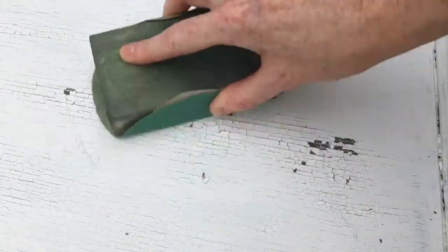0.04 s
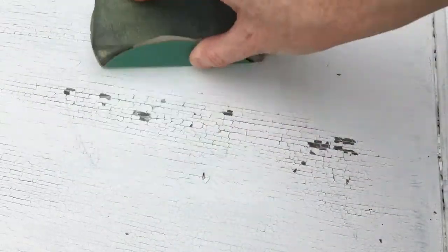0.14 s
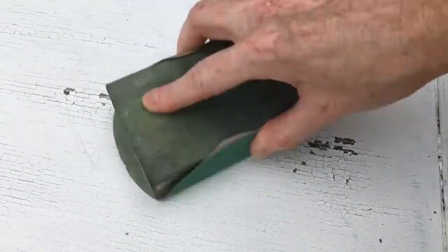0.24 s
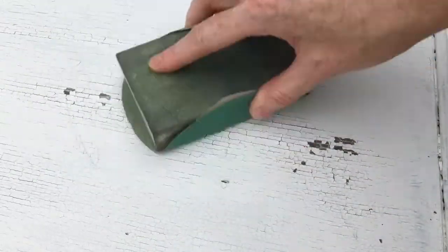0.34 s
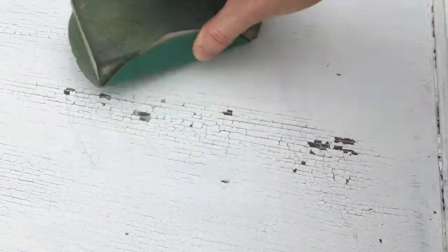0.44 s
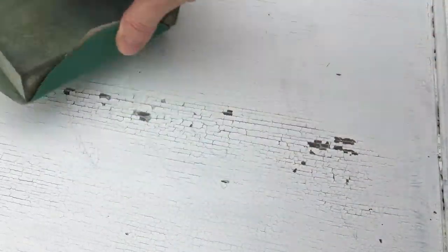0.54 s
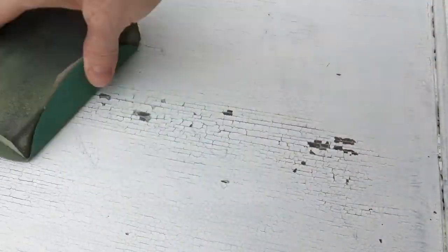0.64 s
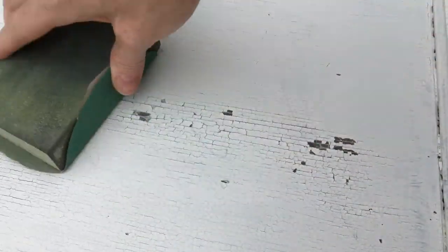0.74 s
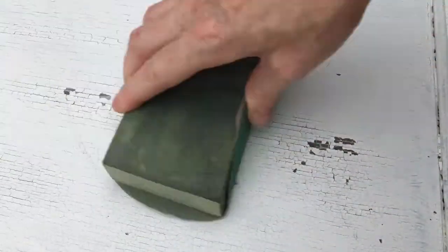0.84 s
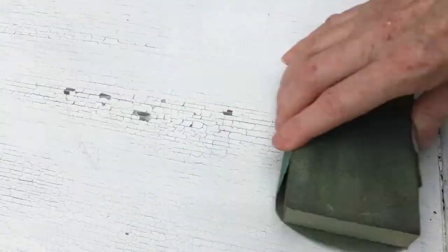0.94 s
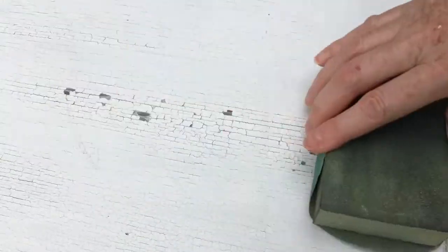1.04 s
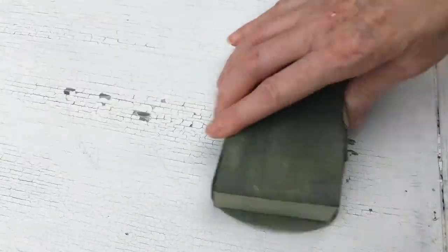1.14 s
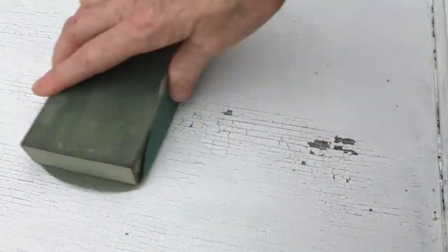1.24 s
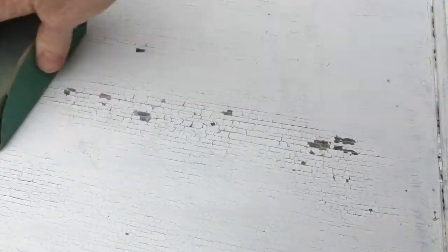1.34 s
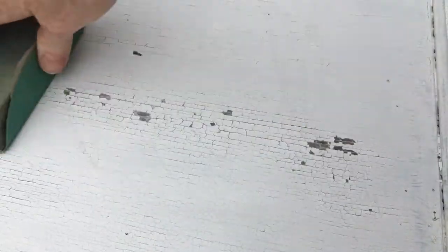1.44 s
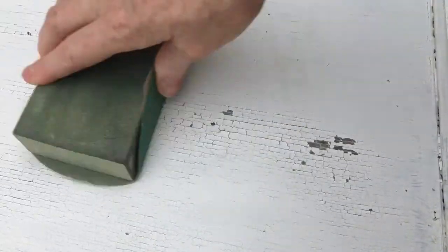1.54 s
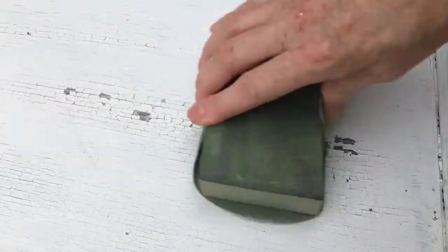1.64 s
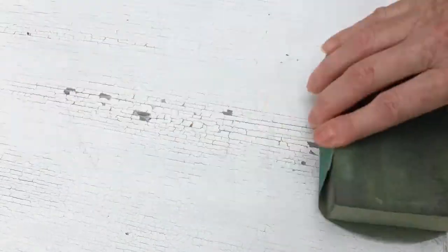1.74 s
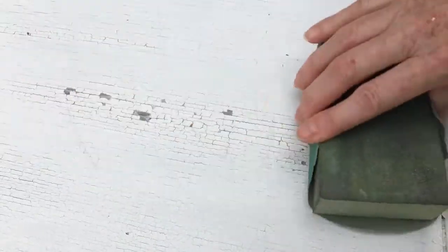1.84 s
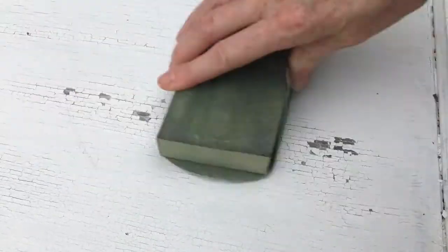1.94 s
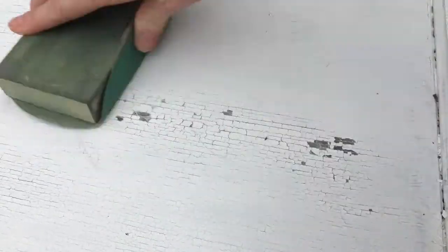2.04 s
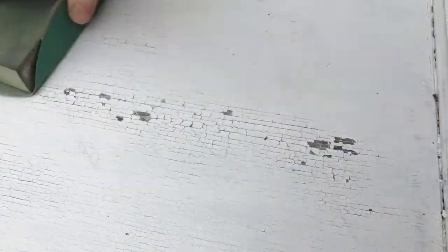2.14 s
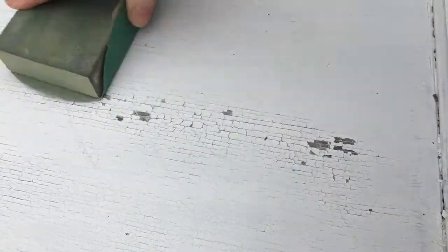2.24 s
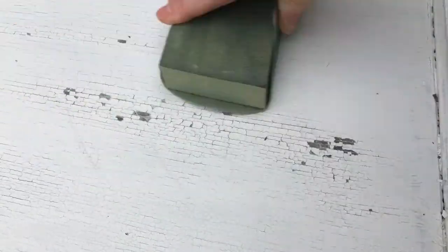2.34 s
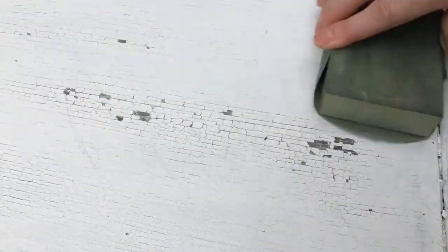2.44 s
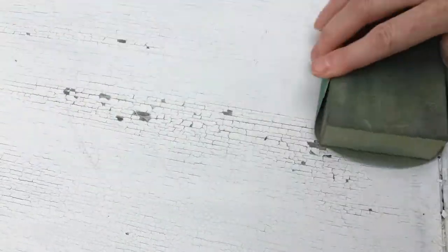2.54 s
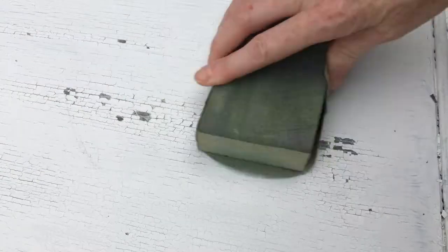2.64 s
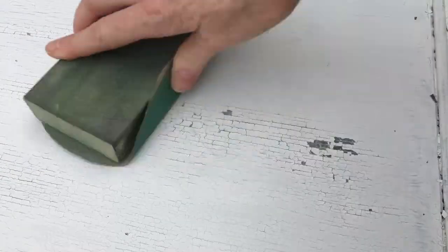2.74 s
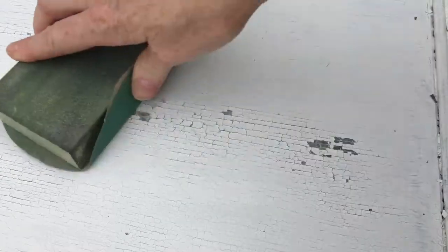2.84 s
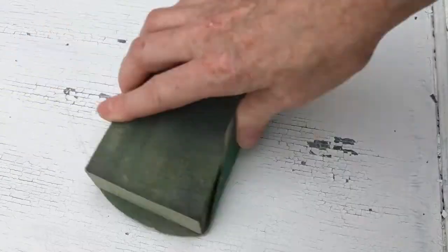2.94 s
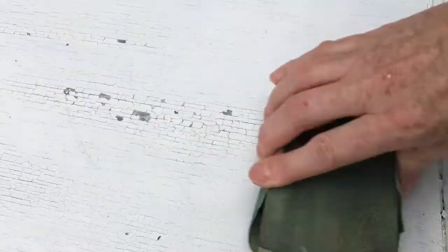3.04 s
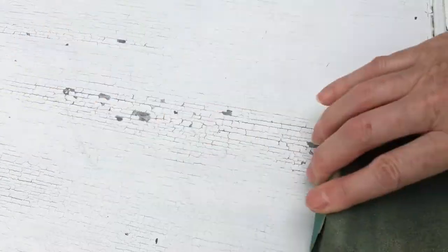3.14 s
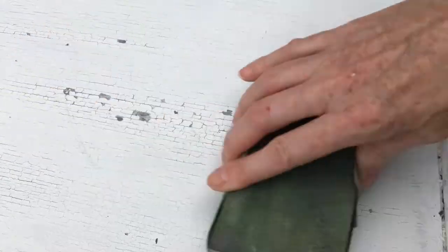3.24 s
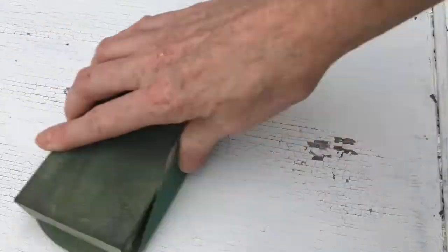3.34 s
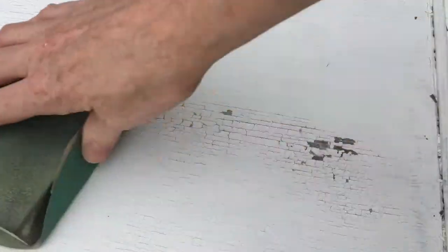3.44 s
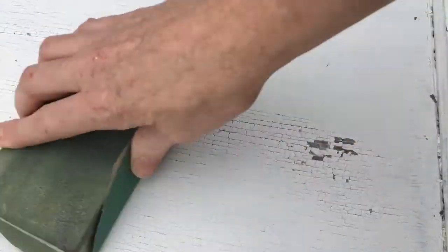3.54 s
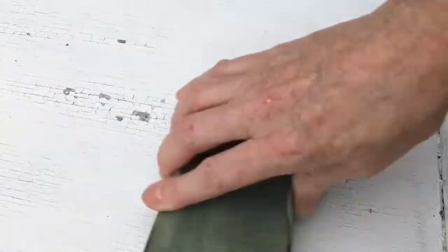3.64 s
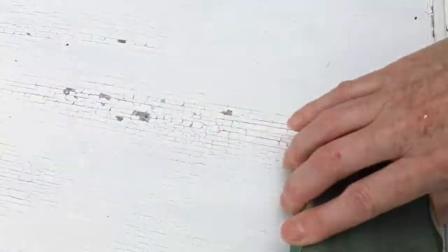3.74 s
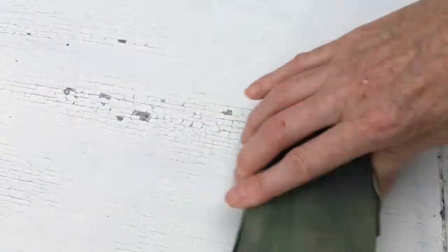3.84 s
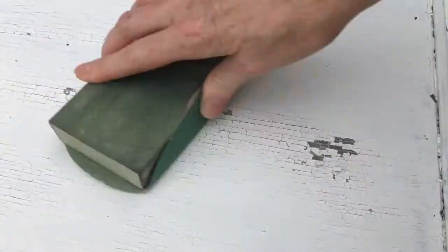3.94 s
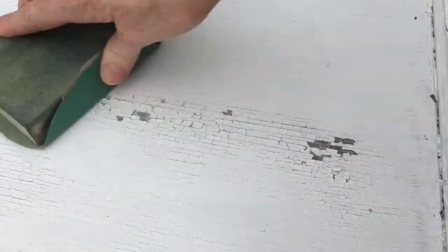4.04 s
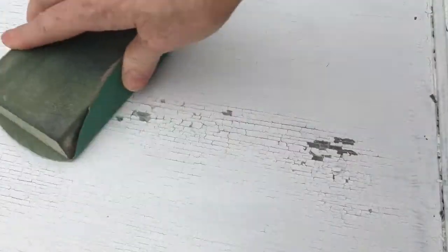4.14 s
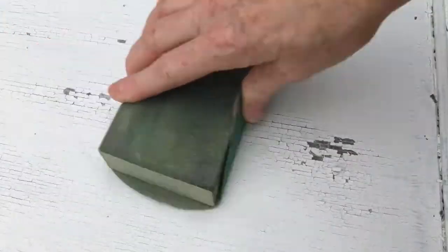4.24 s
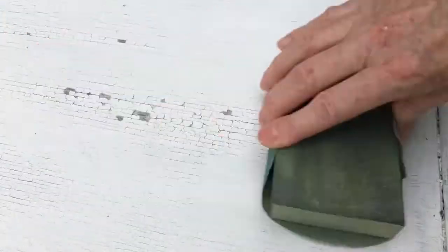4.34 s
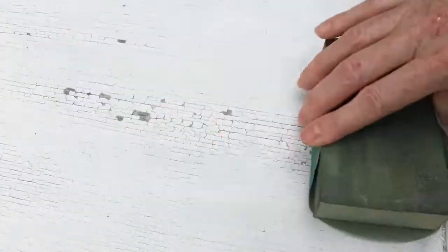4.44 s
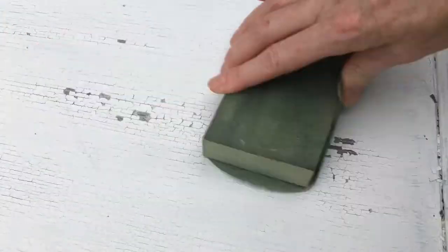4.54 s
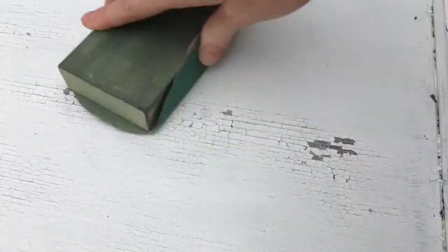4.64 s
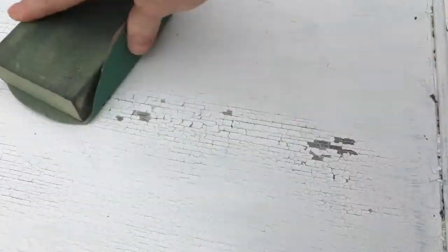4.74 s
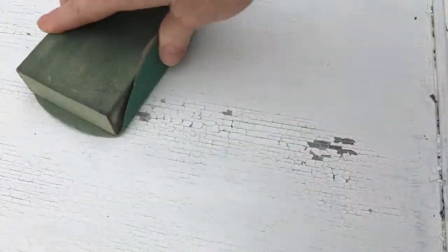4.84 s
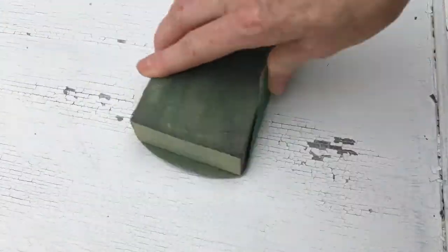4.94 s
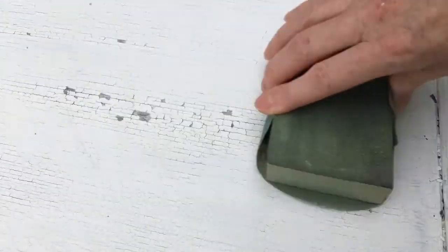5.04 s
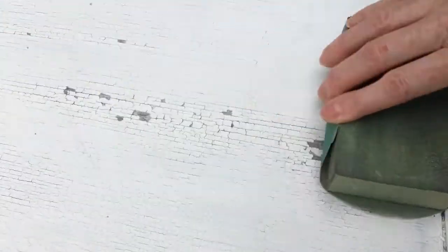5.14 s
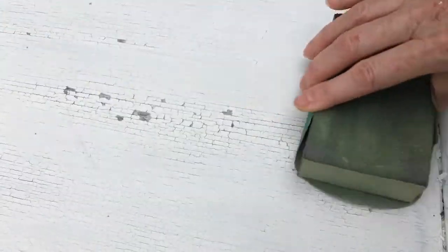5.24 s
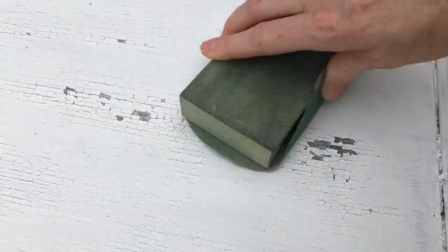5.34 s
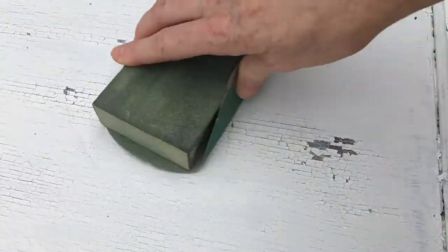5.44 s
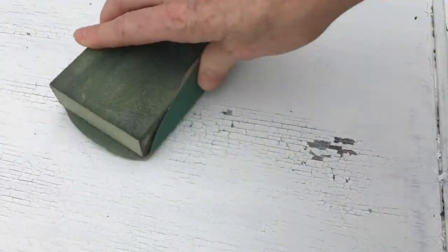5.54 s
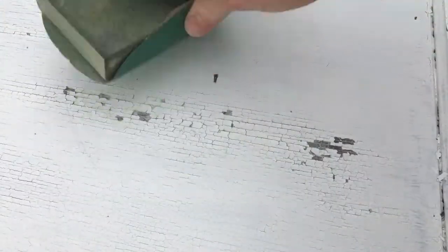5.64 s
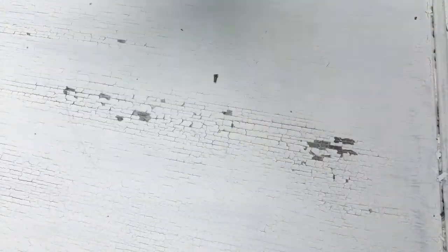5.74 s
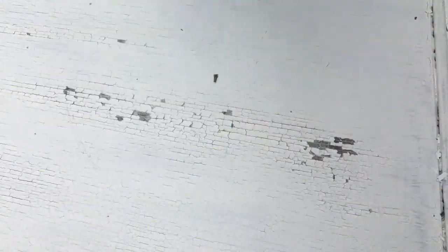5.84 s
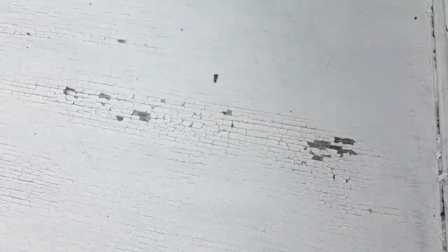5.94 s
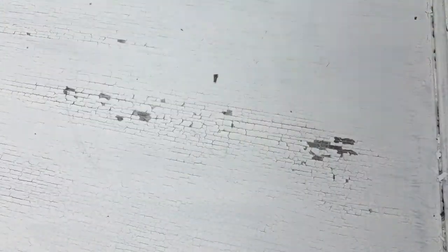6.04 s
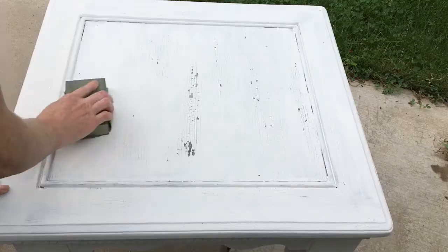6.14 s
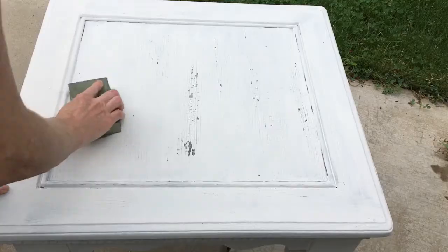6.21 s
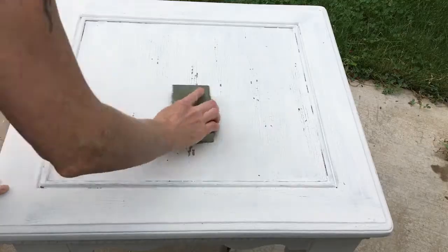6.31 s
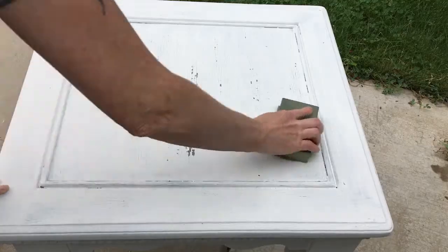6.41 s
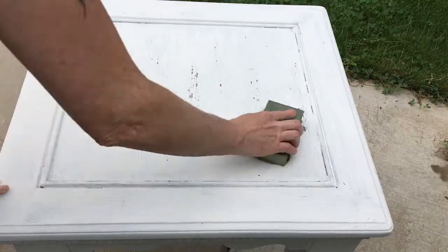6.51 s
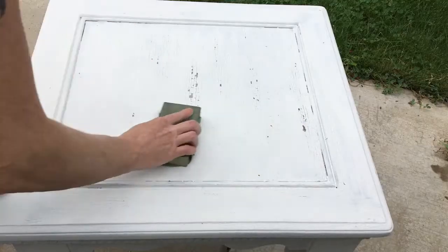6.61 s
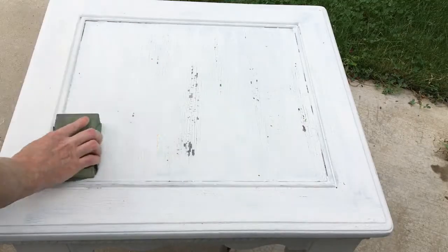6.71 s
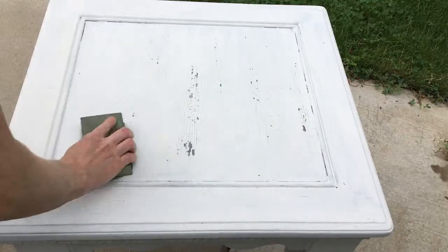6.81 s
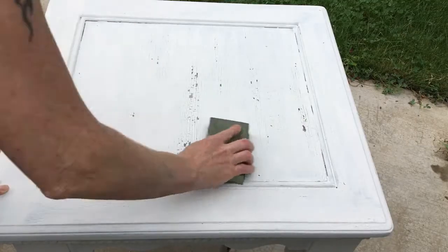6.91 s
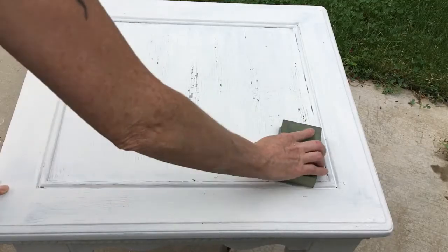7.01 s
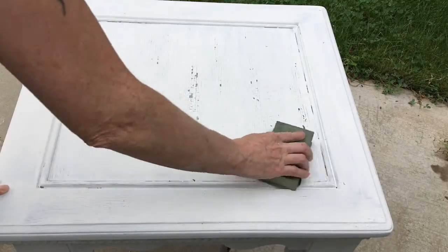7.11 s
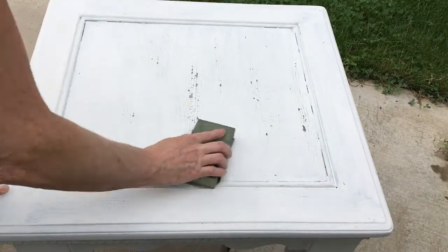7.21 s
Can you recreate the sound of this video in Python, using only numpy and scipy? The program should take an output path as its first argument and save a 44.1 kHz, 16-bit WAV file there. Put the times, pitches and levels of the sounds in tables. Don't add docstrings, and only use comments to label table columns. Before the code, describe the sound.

Quick alternating strokes of sandpaper on painted wood, dry and hissy, each swelling and dipping at the turn, with hollow board knocks now and then. A distant engine hums at the start and fades; other low drones pass faintly. After a short gap the view changes and sanding continues with a little less closeness, while an engine revs softly far away. Open air, little echo, mono sound.

```python
import sys
import numpy as np
from scipy import signal
from scipy.fft import rfft, irfft
from scipy.io import wavfile
from scipy.ndimage import uniform_filter1d

SR = 44100
rng = np.random.default_rng(int(sys.argv[2]) if len(sys.argv) > 2 else 0)


def store_wav(level_fs):
    pcm = np.round(np.clip(np.atleast_2d(level_fs), -1, 1) * 32767)
    wavfile.write(sys.argv[1], SR, pcm.T.astype(np.int16))


def voltage_ratio(decibels):
    exponent = np.asarray(decibels, float) / 20
    return 10 ** exponent


N = 320607
CUT_S = 6.1268


def evened(x):
    return x / np.sqrt(np.mean(x ** 2) + 1e-20)


def read(points, hz):
    f, value = np.transpose(points)
    return np.interp(np.log(hz + 1), np.log(f + 1), value)


def columns(rows):
    s, *cols = np.transpose(rows)
    t = np.arange(max(s[0], 0), s[-1], 1 / SR)
    return t[0], [np.interp(t, s, c) for c in cols]


def add(mix, s, sound):
    part = mix[round(max(s, 0) * SR):][:len(sound)]
    part += sound[:len(part)]


def resonate(x, hz, width):
    turn = np.exp(2j * np.pi * hz * np.arange(len(x)) / SR)
    r = np.exp(-np.pi * abs(width) / SR)
    return 2 * (turn * signal.lfilter([1 - r], [1, -r], x / turn)).real


def fuzzy_tone(count, hz, width):
    noise = rng.standard_normal(count)
    return evened(resonate(resonate(noise, hz, width), hz, width))


def coloured(x, colour_db, size, patchy_db, wide, long):
    hz, t, z = signal.stft(x, SR, nperseg=size)
    patches = rng.standard_normal(z.shape[::-1]).T
    patches = uniform_filter1d(patches, int(wide), 0)
    patches = evened(uniform_filter1d(patches, int(long), 1))
    z = z * voltage_ratio(colour_db(hz[:, None], t) + patchy_db * patches)
    return signal.istft(z, SR, nperseg=size)[1][:N]


def band(x, lo_hz, hi_hz):
    hz = np.fft.rfftfreq(N, 1 / SR) + 1
    loss = (1 + (lo_hz / hz) ** 9) * (1 + (hz / hi_hz) ** 9)
    return irfft(rfft(x) / np.sqrt(loss), N)


def outdoors():
    # f/Hz, density/dB per Hz
    ambient = [(13, -46.5), (25, -34), (48, -1.5), (70, -3), (94, -5), (140, -7), (230, -15.5), (500, -30),
               (1100, -31), (2400, -41), (3600, -49), (4800, -56), (8000, -63), (15700, -72)]
    # t/s, rumble level/dB
    traffic = [(0, -46), (.6, -48), (1., -47.5), (4.699, -51.5), (6.101, -50), (6.4, -55), (7.27, -51.5)]
    # t/s, hiss level over the rumble/dB
    leaves = [(0, 6), (.55, 5), (1.1, 4), (5., 8.5), (5.9, 1), (6.4, 8.5), (7.27, 6.5)]
    # f/Hz, width/Hz, level/dB
    whistles = [
        (70, 4, -52),
        (119.5, 2.5, -53),
        (143, 10, -56),
        (1044, 25, -73),
    ]

    def colour(hz, t):
        leaf_share = hz ** 2 / (hz ** 2 + 370.0 ** 2) / (1 + (hz / 7000.0) ** 4)
        return read(ambient, hz) + leaf_share * np.interp(t, *np.transpose(leaves))

    air = coloured(rng.standard_normal(N), colour, size=2048, patchy_db=2.0, wide=6, long=6)
    s, rumble_db = np.transpose(traffic)
    rumble = voltage_ratio(np.interp(np.arange(N) / SR, s, rumble_db))
    air = air / np.std(band(air, 69.1, 320.)) * rumble
    for hz, width, db in whistles:
        air = air + voltage_ratio(db) * fuzzy_tone(N, hz, width)
    return air


def engines():
    # t/s, firing f/Hz, first-order level/dB
    idle = [(0, 70, -31), (.12, 70.1, -32), (.33, 71.15, -40), (.76, 70.5, -37), (.84, 70.5, -47),
            (1.2, 70.74, -46), (1.3, 72.1, -59)]
    # steady level/dB, fade start t/s, fade/dB per s
    idle_orders = [(-46.5, 0.77, 25), (-43.5, 0.76, 60)]
    # t/s, f/Hz, level/dB
    pull = [(6.13, 49.9, -49), (6.53, 50.2, -49), (6.64, 45.4, -47), (6.8, 50.4, -41.5), (6.855, 52.8, -58),
            (6.89, 54.3, -42), (7.27, 55.4, -37)]
    # loudest t/s, f/Hz, level/dB, swell/s, fade/s (time for 10 dB)
    drones = [
        (1.58, 157.5, -43.5, 0.14, 0.15),
        (1.86, 158.5, -48, .08, 0.31),
        (3.92, 226, -71, 0.23, 0.27),
        (5.45, 232, -55, 0.33, .35),
        (6.66, 102.5, -45, .1, 0.42),
        (7.22, 100.5, -44, .06, 0.23),
    ]
    out = np.zeros(N)
    for rows, orders in ((idle, idle_orders), (pull, [])):
        s, (hz, first_db) = columns(rows)
        turns, t = np.cumsum(hz) / SR, np.arange(len(hz)) / SR
        orders_db = [first_db] + [db - fade * np.maximum(t - at, 0) for db, at, fade in orders]
        tone = np.zeros(len(hz))
        for k, db in enumerate(orders_db, 1):
            tone -= voltage_ratio(db + 1.5) * np.cos(2 * np.pi * k * turns)
        add(out, s, tone * signal.windows.tukey(len(hz), 500 / len(hz)))
    t = np.arange(N) / SR
    for s, hz, db, swell, fade in drones:
        down_db = 10 * np.where(t < s, (s - t) / swell, (t - s) / fade)
        out = out + voltage_ratio(db + 2.0 - down_db) * np.cos(2 * np.pi * hz * t)
    return out


def hand():
    # break-away t/s, slide/s, top scrape level/dB, top at share of slide/0-1, slowing before stop/dB
    rightward = [(0.718, 0.28, -34.4, 0.25, 12.2), (1.441, 0.324, -35.2, 0.2, 10.2),
                 (2.192, 0.268, -34.9, 0.37, 5.8), (2.864, 0.248, -35.4, 0.28, 9.7),
                 (3.514, 0.251, -33.3, 0.31, 15.8), (4.127, 0.289, -35.7, 0.33, 12.6),
                 (4.812, 0.311, -37.8, 0.25, 6.6)]
    leftward = [(1.067, 0.31, -35.9, 0.85, 11.3), (1.838, 0.296, -35.9, 0.7, 9.0),
                (2.549, 0.264, -36.4, 0.76, 15.8), (3.184, 0.27, -35.7, 0.84, 14.6),
                (3.818, 0.249, -36.0, 0.64, 11.7), (4.477, 0.271, -36.8, 0.73, 11.2),
                (5.234, 0.311, -40.1, 0.42, 16.3)]
    far_right = [
        (6.208, 0.22, -36.9, 0.21, 2.6),
        (6.77, 0.265, -37.2, 0.26, 10.2),
    ]
    far_left = [
        (5.95, 0.218, -36.1, 0.86, 14.1),
        (6.493, 0.237, -36.0, 0.88, 12.0),
        (7.1, 0.302, -38.3, 0.71, 10.0),
    ]
    scrubs = [
        (-0.025, 0.145, -37.6, 0.83, 5.6),
        (0.162, 0.126, -37.5, 0.73, 13.9),
        (0.291, 0.137, -40.0, 0.5, 16.2),
        (2.483, 0.027, -58.7, 0.19, 4.2),
        (2.517, 0.023, -48.6, 1.0, 3.5),
    ]
    # start place, end place (0 left - 1 right), break-away under top/dB, rise bend, fall bend
    ways = [
        (.03, .88, 8.8, 2.23, 2.3),
        (.88, -.07, 14.9, 6.6, 2.28),
        (.02, .89, 15.3, 1.16, 3.9),
        (.75, .02, 14, 3.9, 2.5),
        (1.04, .52, 9.2, 3.04, 1.08),
    ]
    # breaking loose/dB per s, sticking/dB per s
    grip = [(1910, 1210), (890, 1440), (1420, 1560), (1050, 780), (2030, 1640)]
    top, slow = np.full(N, -200.), np.zeros(N)
    ends, t = [], np.arange(N) / SR
    kinds = zip((rightward, leftward, far_right, far_left, scrubs), ways, grip)
    for rows, (first, last, break_db, rise, fall), (slip, stick) in kinds:
        for s, slide, db, share, fall_db in rows:
            on = slice(max(round((s - .06) * SR), 0), round((s + slide + .06) * SR))
            u = np.clip((t[on] - s) / slide, 0, 1)
            p = np.clip(share, .05, .95)
            lost = break_db * np.maximum(1 - u / p, 0) ** rise
            lost = lost + fall_db * np.maximum((u - p) / (1 - p), 0) ** fall
            held = db - slip * np.maximum(s - t[on], 0) - stick * np.maximum(t[on] - s - slide, 0)
            louder = held - lost > top[on] - slow[on]
            top[on], slow[on] = np.where(louder, [held, lost], [top[on], slow[on]])
            ends += [(s, first), (s + slide, last)]
    return top, slow, np.interp(t, *np.transpose(sorted(ends)))


def sanding():
    # f/Hz, density/dB per Hz
    near_spectrum = [(240, -31), (400, -21), (890, -16.5), (1150, -11), (2000, -7.5), (2850, -2.5),
                     (3350, -6), (4460, -4), (6150, -1.5), (7510, -4.5), (8760, 0.5), (10200, -4),
                     (12100, -1.5), (15700, -4)]
    far_spectrum = [(240, -56), (400, -26), (519, -11.5), (836, -14.5), (960, -9), (1480, -6), (2410, 0),
                    (3710, -4.5), (4320, -5), (6060, -2), (7630, -5.5), (8900, 1), (10200, -3), (12300, -1),
                    (15700, -3)]
    # f/Hz, width/Hz, depth with pad left/dB, with pad right/dB
    notches = [
        (3230, 150, 16, 2),
        (3750, 250, 0, 8),
        (4950, 130, 7, 5),
        (10350, 350, 4, 2),
        (4350, 500, -3, 2.5),
        (7800, 700, -2, 1),
        (11800, 800, -2, 1),
    ]
    # t/s, half length/s, board level/dB
    digs = [(.345, .035, 6.5), (0.413, .02, -8), (0.783, 0.044, 1), (2.448, 0.013, 1), (2.51, 0.028, 8.5),
            (2.72, 0.045, -1.5), (3.095, .025, 4), (4.43, .015, 6), (5.11, 0.022, 4), (6.422, .025, 4),
            (6.71, 0.041, 3.5), (7.2, 0.073, 2.5)]
    t = np.arange(N) / SR
    top, slow, pad = hand()

    size = voltage_ratio(2.5 * np.minimum(rng.exponential(1, N), 4)) * rng.choice([-1., 1.], N)
    catches = size * (rng.random(N) < 7000. / SR)
    judder = voltage_ratio(0.33 * evened(uniform_filter1d(rng.standard_normal(N), 300)))
    grit = judder * (0.71 * rng.standard_normal(N) + 0.49 * evened(catches))

    def colour(hz, frame_t):
        place = 0.28 + (1 - 0.28) * np.interp(frame_t, t, pad)
        dips = 0
        for f, width, left_db, right_db in notches:
            depth_db = left_db + place * (right_db - left_db)
            dips = dips + depth_db * np.exp(-((hz - f) / width) ** 2)
        return np.where(frame_t < CUT_S, read(near_spectrum, hz), read(far_spectrum, hz)) - dips

    grit = coloured(grit, colour, size=1024, patchy_db=1.58, wide=14, long=6)
    layers = band(grit, 250., 2800.0), band(grit, 3600.0, 7300.0), band(grit, 7900.0, 15700.0)
    cut = round(CUT_S * SR)
    board, scrape, fine = (np.r_[evened(x[:cut]), evened(x[cut:])] for x in layers)

    touching = (t < 5.7) | (t >= CUT_S)
    creep = voltage_ratio(np.where(t < CUT_S, -75, -69))
    creep = creep * ((t < .43) | (t > .71)) * ((t < 5.5) | (t > CUT_S))

    board_db = -8.5 - 0.29 * slow + 3.5 * pad
    for s, half, db in digs:
        board_db = board_db + db * np.exp(-((t - s) / half) ** 2)
    scrape_db = -0.7 - slow
    fine_db = -1 - 1.23 * slow + 4.5 * np.exp(-((pad - 0.69) / 0.31) ** 2)
    rubbed = (voltage_ratio(top + board_db) + creep) * board
    rubbed = rubbed + (voltage_ratio(top + scrape_db) + creep) * scrape
    rubbed = rubbed + (voltage_ratio(top + fine_db) + creep) * fine
    return touching * rubbed


def knocks():
    # t/s, peak level/dB, f/Hz, decay time t60/s
    thumps = [
        (1.159, -30, 128.7, 0.085),
        (1.339, -25.5, 135, 0.059),
        (1.515, -47, 140, 0.09),
        (2.473, -28.5, 137, 0.12),
        (3.121, -39, 141, 0.24),
        (3.815, -35, 101, 0.12),
        (4.248, -34.5, 149, 0.22),
        (5.122, -31, 141, 0.27),
        (6.485, -26.5, 136, 0.13),
    ]
    # t/s, peak level/dB, f/Hz, decay time t60/s
    set_down = [
        (0.656, -33, 326, 0.072),
    ]
    # t/s, peak level/dB, centre f/Hz, width/Hz, length/s
    ticks = [(.532, -66, 7000, 3000, .002), (.637, -62, 9000, 5000, .002), (.646, -63, 8000, 9000, .009),
             (.6542, -38, 9000, 12000, .0022), (.6542, -28, 1300, 2500, .0035),
             (.664, -52, 1500, 3000, .003), (2.458, -38, 500, 900, .006), (3.114, -36, 400, 800, .006),
             (5.127, -36, 400, 800, .006), (6.428, -39, 600, 1000, .006), (5.143, -52, 7500, 2500, .003),
             (5.15, -54, 9000, 5000, .004), (5.17, -54, 2500, 3000, .003), (5.204, -52, 2500, 6000, .003),
             (5.801, -53, 2300, 700, .004), (5.802, -66, 6000, 6000, .002), (5.882, -72, 9000, 6000, .014),
             (5.892, -67, 6000, 4000, .01), (5.91, -70, 6500, 5000, .012), (5.924, -70, 10000, 4000, .002)]
    out, t = np.zeros(N), np.arange(8000) / SR
    for s, db, hz, t60 in thumps + set_down:
        ring = voltage_ratio(db - 60 * t / t60) * np.sin(2 * np.pi * hz * t)
        add(out, s, ring * np.minimum(t / 0.0096, 1))
    for s, db, hz, width, length in ticks:
        burst = fuzzy_tone(len(t), hz, width)
        add(out, s, voltage_ratio(db - 4) * burst * np.exp(-(t / length) ** 2) * np.minimum(t / .001, 1))
    return out


def yard(x):
    t = np.arange(9000) / SR
    tail = rng.standard_normal(len(t)) * voltage_ratio(-60 * t / .35)
    return signal.fftconvolve(x, tail / np.linalg.norm(tail))[:N]


def insect():
    # f/Hz, width/Hz, level/dB, start t/s
    song = (5650, 300, -88, 4.5)
    hz, width, db, start = song
    throb = voltage_ratio(2.5 * evened(uniform_filter1d(rng.standard_normal(N), 900)))
    throb = throb * np.clip(np.arange(N) / SR - start, 0, 1)
    return voltage_ratio(db) * throb * fuzzy_tone(N, hz, width)


def scene():
    near = sanding() + knocks()
    echo = voltage_ratio(-32) * yard(near)
    self_noise = voltage_ratio(-88) * rng.standard_normal(N)
    mono = near + echo + engines() + outdoors() + insect() + self_noise
    return np.array([mono, mono])


def band_limit(x):
    return signal.sosfilt(signal.butter(12, 17050, fs=SR, output="sos"), x)


def record(dry):
    low_pass = signal.firwin(1023, 15830, window=("kaiser", 9), fs=SR)
    limited = signal.oaconvolve(dry, low_pass[None], "same")
    return band_limit(limited)


dry = scene()
out = record(dry)
store_wav(out)
```